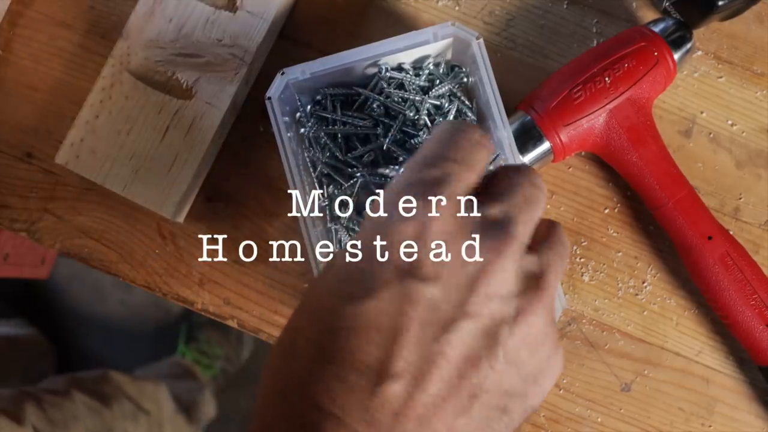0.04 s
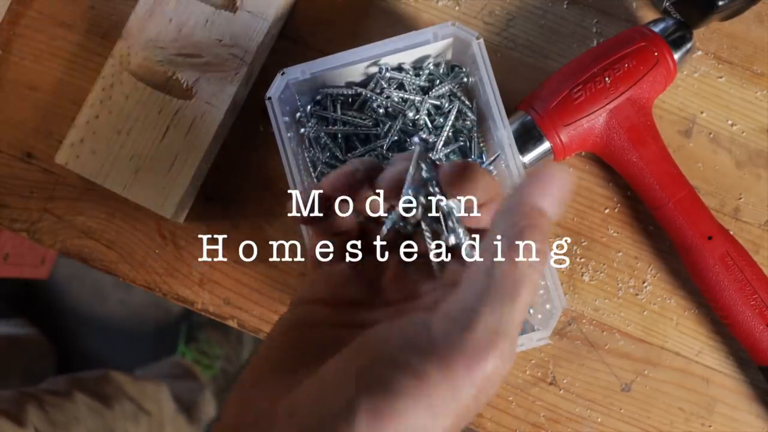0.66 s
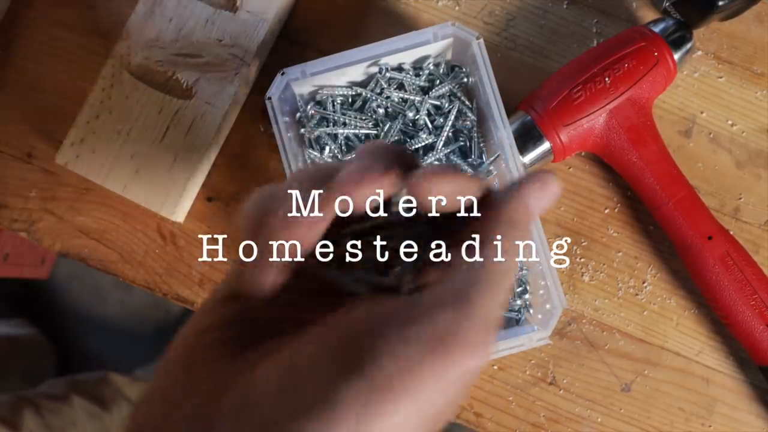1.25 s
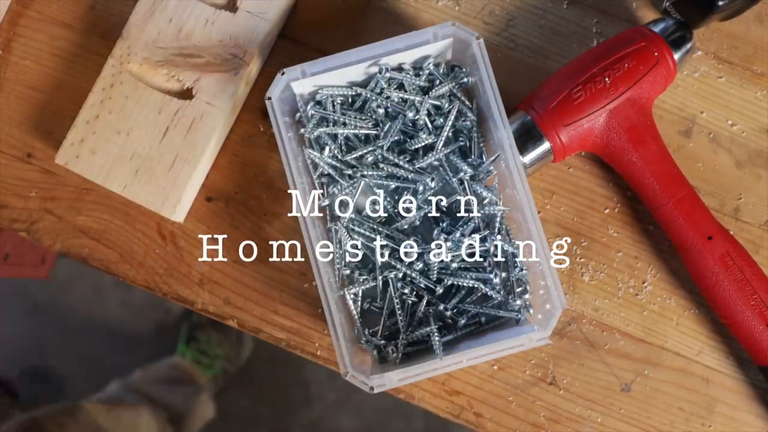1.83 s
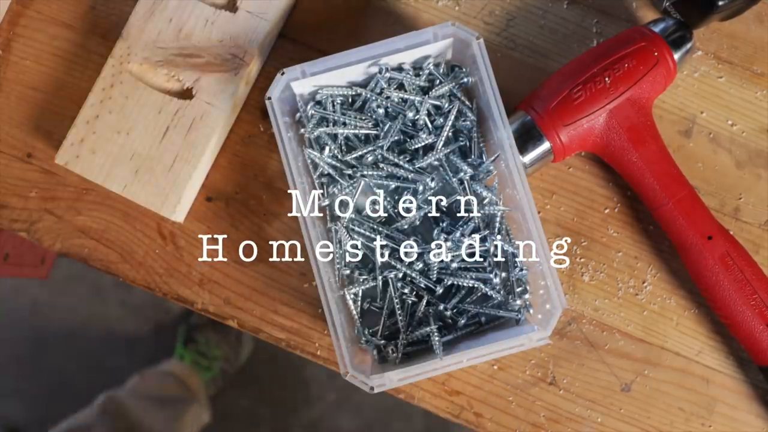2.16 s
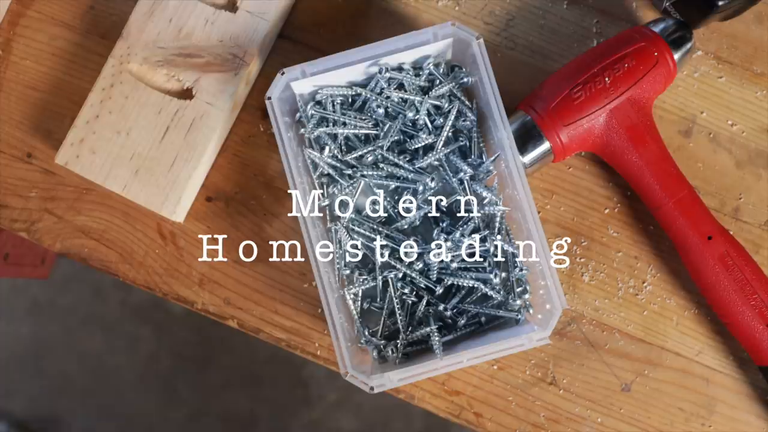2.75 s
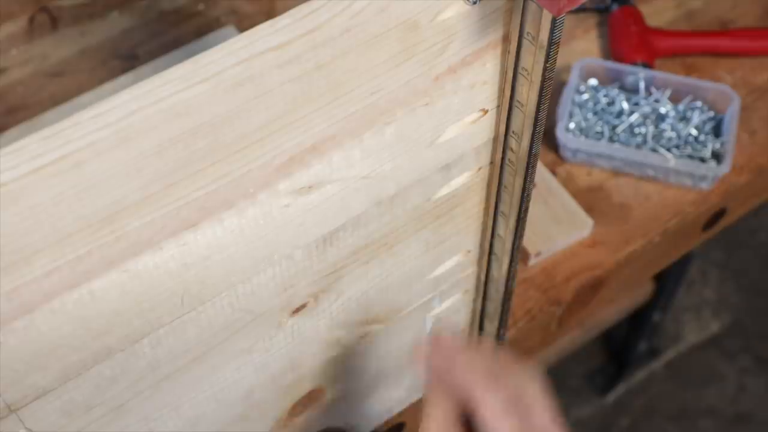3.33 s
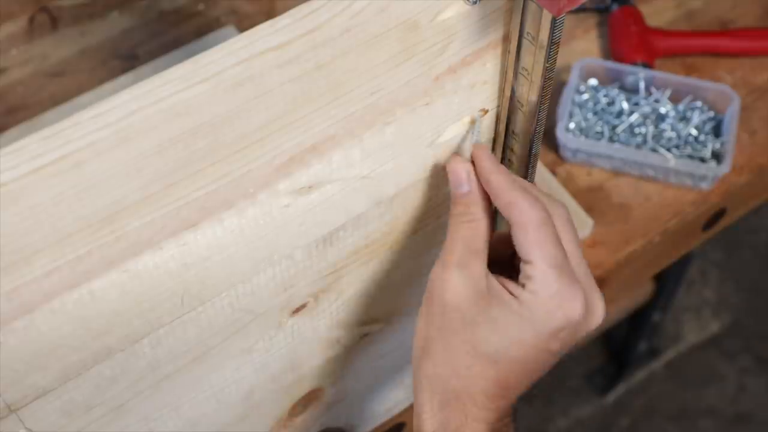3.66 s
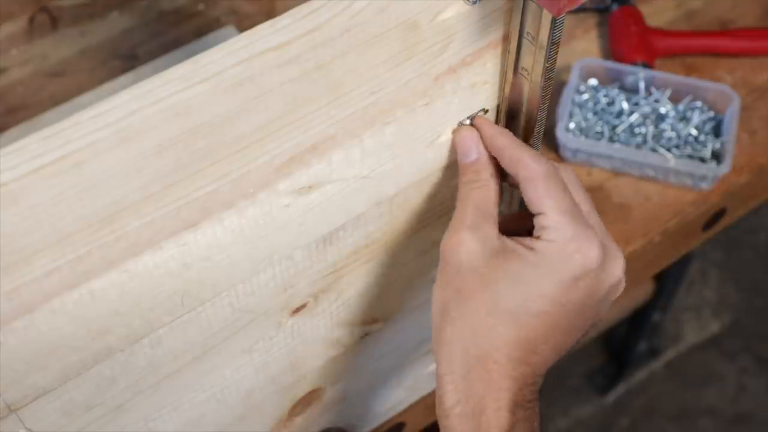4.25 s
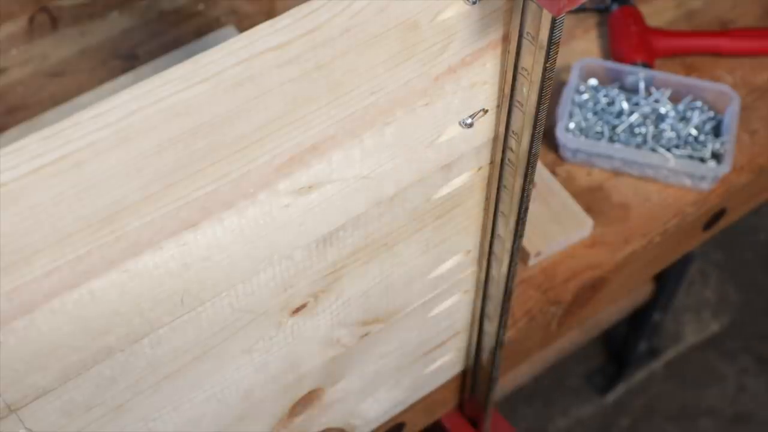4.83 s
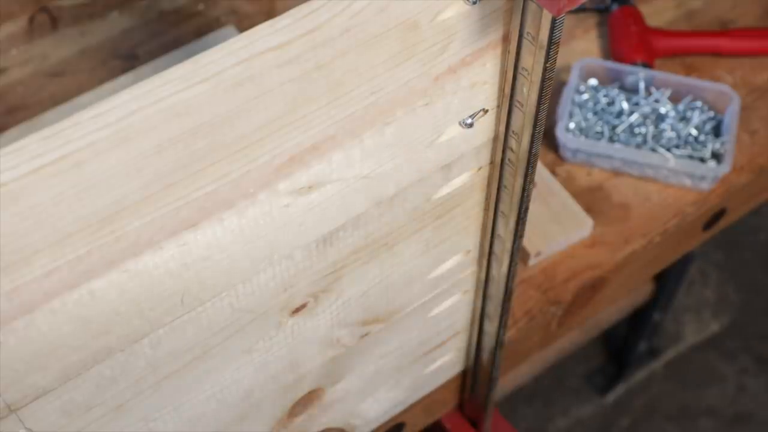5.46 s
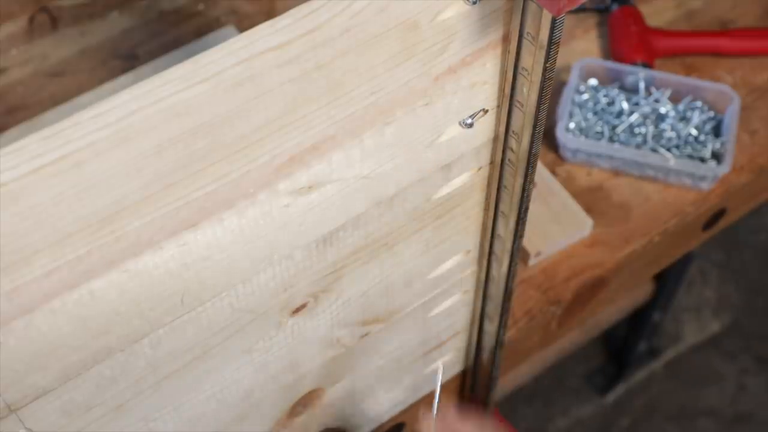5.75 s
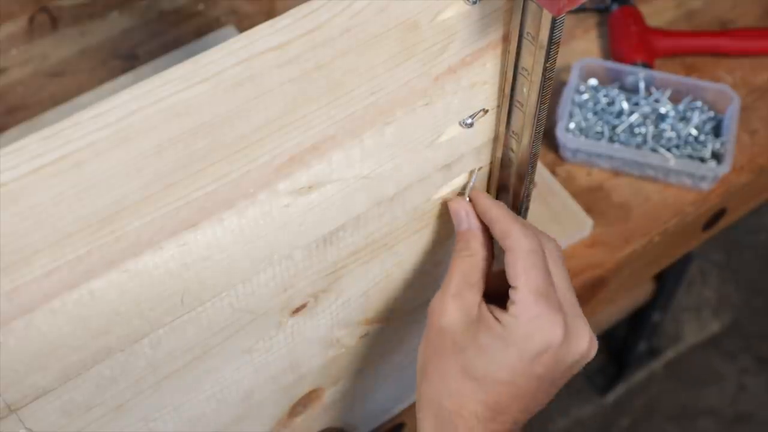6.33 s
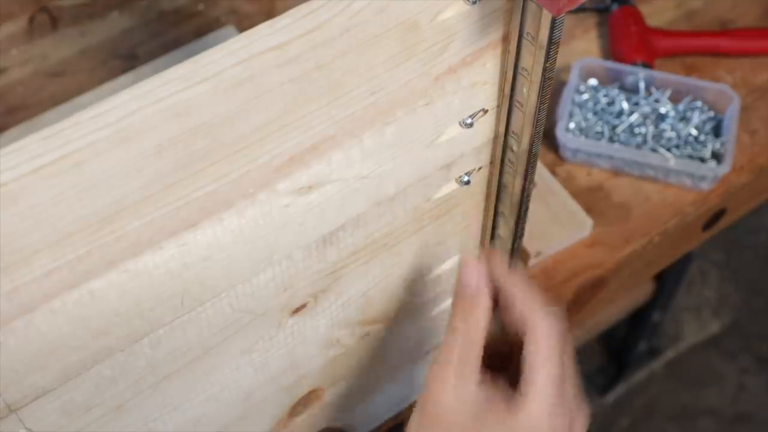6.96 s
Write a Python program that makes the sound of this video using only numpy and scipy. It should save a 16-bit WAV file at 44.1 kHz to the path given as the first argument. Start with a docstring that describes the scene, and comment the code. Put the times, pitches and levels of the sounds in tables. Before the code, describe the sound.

A hand digs out steel screws that clink brightly, followed by light scraping and two hard knocks on a wooden board.

```python
"""Steel screws rattle against the walls of a small plastic box as a hand digs them out on a workbench.
They jingle and clink in the palm, ringing at nearly one pitch and beating against each other.
A screw tip then scrapes and taps in a hole in a pine board, and two hard knocks ring the board's
bending modes. The workshop adds a short echo over faint air noise, hum and soft swells of shuffle."""
import sys
import numpy as np
from scipy import signal
from scipy.fft import rfft, irfft, next_fast_len
from scipy.io import wavfile
from scipy.ndimage import uniform_filter1d

SR = 44100
rng = np.random.default_rng(int(sys.argv[2]) if len(sys.argv) > 2 else 0)


def transcribe(signal):
    """Save signal, clipped to [-1, 1], as a 16-bit WAV file at the path in sys.argv[1]."""
    frames = np.atleast_2d(signal).T
    limited = np.clip(frames, -1, 1)
    pcm = np.round(limited * 32767).astype(np.int16)
    wavfile.write(sys.argv[1], SR, pcm)


N = 313110


def amp(db):
    """Decibels to gain."""
    return 10 ** (np.asarray(db) / 20)


def unit(x):
    """Scale to rms 1."""
    return x / np.sqrt(np.mean(x ** 2) + 1e-20)


def seconds(size):
    """Time axis."""
    return np.arange(size) / SR


def fade(t, t60_s):
    """Exponential decay from t = 0."""
    return (t >= 0) * np.exp(-np.log(1000) * np.abs(t) / t60_s)


def held(start_s, length_s, attack_s, release_s):
    """Envelope: rise, hold, decay."""
    t = seconds(N) - start_s
    return (t >= 0) * (1 - fade(t, attack_s)) * fade(np.maximum(t - length_s, 0), release_s)


def along(points, hz):
    """Interpolate (freq_hz, value) points on a log axis."""
    freqs_hz, values = np.transpose(points)
    return np.interp(np.log(hz + 1), np.log(freqs_hz), values)


def add(track, start_s, sound):
    """Mix a sound into a track."""
    start = max(round(start_s * SR), 0)
    part = track[start:start + len(sound)]
    part += sound[:len(part)]


def filtered(x, response):
    """Apply a frequency response."""
    size = next_fast_len(len(x) + 8192)
    return irfft(rfft(x, size) * response(np.fft.rfftfreq(size, 1 / SR)), size)[:len(x)]


def coloured(x, spectrum):
    """Shape x by a spectrum, at rms 1."""
    return unit(filtered(x, lambda hz: amp(along(spectrum, hz))))


def noise(spectrum, size=N):
    """Shaped noise at rms 1."""
    return coloured(rng.standard_normal(size), spectrum)


def resonate(x, peaks):
    """Pass x through a body's resonances, alternating in polarity."""
    def response(hz):
        return sum((-1) ** k * amp(db) * 1j * hz * width / (centre ** 2 - hz ** 2 + 1j * hz * width)
                   for k, (centre, width, db) in enumerate(peaks))
    return filtered(x, response)


def contacts(per_s, spread_db):
    """Random tiny impacts of uneven strength, at rms 1."""
    strength = amp(spread_db * np.clip(rng.standard_normal(N), -2, 2)) * rng.choice([-1, 1], N)
    return unit(strength * (rng.random(N) < per_s / SR))


def evened(x, span_s):
    """Hold the running rms near 1."""
    power = uniform_filter1d(x ** 2, max(int(span_s * SR), 1))
    return x / np.sqrt(np.abs(power) + 1e-3)


def struck(peaks, contact_t60_s, cutoff_hz):
    """A body's response to one gritty contact, at peak 1; softness cuts the treble."""
    t = seconds(4096)
    push = 0.5 * fade(t, contact_t60_s) * rng.standard_normal(len(t))
    push[0] += 1
    ring = resonate(push, peaks)
    ring = filtered(ring, lambda hz: 1 / (1 + 1.3j * hz / cutoff_hz - (hz / cutoff_hz) ** 2))
    return ring / np.abs(ring).max()


# plastic wall resonances: centre_hz, width_hz, gain_db
BOX_MODES = [(1074, 100, -4), (1287, 193, 0.5), (1467, 90, 3.5), (1715, 204, 0.5), (2256, 174, -2.5),
             (3060, 690, -12)]
# stirred heap: freq_hz, density_db
STIR_SPECTRUM = [(50, -28), (130, -13.5), (600, -12), (1200, -5.5), (3000, -3), (4500, -19), (7000, -21.5),
                 (15000, -12)]
# screws hitting the wall: start_s, level_db
WALL_HITS = [(0.0419, -30), (0.0547, -28), (0.0734, -25.5), (0.1879, -33.5), (0.2662, -36), (0.2748, -36),
             (0.8103, -50), (2.4995, -52)]


def box_rattle():
    """Fingers plunge in; screws drum on the thin plastic walls and settle."""
    level = amp(-42) * held(0, 0.043, attack_s=0.003, release_s=0.65)
    walls = unit(resonate(contacts(per_s=1600, spread_db=1.5), BOX_MODES))
    grit = coloured(contacts(per_s=1100, spread_db=6), STIR_SPECTRUM)
    out = level * (amp(-0.5) * evened(walls, span_s=0.015) + amp(-3.5) * grit)
    for start_s, level_db in WALL_HITS:
        add(out, start_s, amp(level_db - 4) * struck(BOX_MODES, contact_t60_s=0.027, cutoff_hz=2440))
    return out


# shakes of the hand: start_s, rise_s, length_s, level_db
HAND_SHAKES = [(0.0, 0.072, 0.1, -42.5), (0.14, 0.033, 0.088, -55), (0.925, 0.092, 0.22, -39.5),
               (1.125, 0.0046, 0.12, -49), (1.252, 0.045, 0.091, -48), (1.804, 0.047, .077, -43.5),
               (2.12, 0.047, 0.083, -50.5), (2.199, 0.072, 0.11, -44), (2.428, .045, 0.15, -38),
               (2.536, 0.021, .075, -32), (2.619, 0.0097, 0.11, -39.5)]


def shaking(swell_db=7, ease_db=11):
    """Motion of the screws as a gain: each shake starts abruptly, swells, eases and stops."""
    t, level = seconds(N), np.zeros(N)
    for start_s, rise_s, length_s, level_db in HAND_SHAKES:
        effort_db = np.interp(t - start_s, [0, rise_s, max(length_s, rise_s)], [-swell_db, 0, -ease_db])
        level += amp(level_db + effort_db) * held(start_s, length_s, attack_s=0.0088, release_s=0.12)
    return level


# screw modes, second row damped and detuned by neighbours: pitch_hz, level_db, t60_s, spread_ratio
SCREW_MODES = [(10233, 4, 0.095, 0.0195), (10210, -3.5, .018, 0.055), (12180, -20, 0.026, 0.065),
               (13900, -25, 0.013, 0.09)]
# steel on steel: freq_hz, density_db
TICK_SPECTRUM = [(800, -17.5), (2500, -13.5), (5000, -14), (7500, -7.5), (9000, -3), (10500, 7),
                 (11600, 0.5), (12200, -2.5), (14000, -6), (15800, -18.5)]


def jingle(screws=12):
    """Screws of one size ring at nearly one pitch and beat; their threads rasp after each contact."""
    t = seconds(4096)
    ring, hits = np.zeros(N), np.zeros(N)
    for offset in np.linspace(-1, 1, screws) + rng.normal(0, 0.038, screws):
        blows = contacts(per_s=41, spread_db=5)
        modes = sum(amp(db) * np.sin(2 * np.pi * hz * (1 + spread * offset) * t) * fade(t, t60_s)
                    for hz, db, t60_s, spread in SCREW_MODES)
        ring += signal.oaconvolve(blows, modes * (1 - fade(t, 0.00095)))[:N]
        hits += blows
    ring = evened(unit(ring), span_s=0.019)
    rasp_power = signal.oaconvolve(hits ** 2, fade(t, 0.012) ** 2)[:N]
    rasp = np.sqrt(np.abs(rasp_power)) * rng.standard_normal(N)
    rasp = evened(coloured(rasp, TICK_SPECTRUM), span_s=0.021)
    level = shaking()
    # gentle handling favours sliding over ringing
    return amp(-1.5) * level * ring + amp(-31) * level ** 0.64 * rasp


def pings(lowest_hz=11800, highest_hz=15700, t60_s=0.0206, screws=14):
    """Each screw, gripped differently by its neighbours, has its own brief high note."""
    t, notes = seconds(2048), np.zeros(N)
    for pitch_hz in rng.uniform(lowest_hz, highest_hz, screws):
        note = np.sin(2 * np.pi * pitch_hz * t) * fade(t, t60_s)
        notes += signal.oaconvolve(contacts(per_s=14, spread_db=5), note)[:N]
    return amp(-27.5) * shaking() ** 0.86 * unit(notes)


# distinct clinks: start_s, level_db, grip_ratio (0 loose, 1 pinched)
SINGLE_CLINKS = [(0.0544, -32.5, .2), (0.072, -34.5, 0.13), (0.163, -46, .15), (0.19, -43, 0.26),
                 (0.229, -48, 0.25), (0.265, -43.5, 0.23), (0.274, -43, 0.098), (0.433, -42.5, 0.41),
                 (0.443, -42, .14), (0.473, -48, 0.54), (0.485, -43.5, 0.27), (0.506, -46.5, 0.32),
                 (0.606, -59, .26), (0.8347, -48, .05), (0.8869, -46, 0.32), (0.9297, -48, 0.051),
                 (1.05, -19, .02), (1.1319, -20.5, .01), (1.173, -30.5, .02), (1.303, -34.5, 0.045),
                 (1.3372, -42, .15), (1.7835, -54.5, .35), (1.8485, -34, .05), (1.8582, -30.5, .02),
                 (1.942, -50, .08), (2.0842, -54, .2), (2.142, -36, 0.022), (2.2092, -38, 0.15),
                 (2.2352, -30, .02), (2.2666, -28.5, 0.065), (2.3094, -33.5, .05), (2.3363, -36.5, 0.045),
                 (2.4804, -29.5, 0.062), (2.5418, -23.5, .07), (2.5597, -24.5, 0.026),
                 (2.6232, -25.5, 0.027), (2.6845, -22, 0.018), (2.739, -31, 0.067), (3.094, -50, 0.13),
                 (6.549, -54, 0.51)]


def clinks(t60_s=0.041, beat_hz=220, pitch_spread=0.016, stray_count=20):
    """Two screws meet: loose ones ring slightly apart in pitch, pinched ones tick."""
    out, t = np.zeros(N), seconds(4096)
    attack = 1 - fade(t, 0.007)
    # faint random slips in the hand
    strays = [(rng.uniform(0.3, 3.1), rng.uniform(-64, -53), 0.2) for _ in range(stray_count)]
    for start_s, level_db, grip in SINGLE_CLINKS + strays:
        detune, apart = rng.uniform(-1.06, 1, 2)
        pitch_hz = SCREW_MODES[0][0] * (1 + pitch_spread * detune)
        other_hz = pitch_hz - np.sign(detune) * beat_hz * (1 + apart / 2)
        pair = np.sin(2 * np.pi * pitch_hz * t) + 0.5 * np.sin(2 * np.pi * other_hz * t)
        ring = pair * fade(t, t60_s) * attack
        tick = amp(11.5) * noise(TICK_SPECTRUM, len(t)) * fade(t, 0.02) * (1 - fade(t, 0.0017))
        add(out, start_s, amp(level_db - 1.5) * ((1 - grip) * ring + grip * tick))
    return out


# workshop decay: freq_hz, t60_s
ROOM_DECAY = [(100, 0.23), (300, 0.98), (600, 0.95), (1500, 1), (3000, 0.9), (6000, 0.69), (10000, 0.41),
              (16000, 0.47)]


def echo_tail(steady_noise):
    """The workshop's echo builds up, then dies fastest in the bass and high treble."""
    hz, t, bands = signal.stft(steady_noise, SR, nperseg=256)
    tail = signal.istft(bands * fade(t, along(ROOM_DECAY, hz)[:, None]), SR, nperseg=256)[1]
    return tail * (1 - fade(seconds(len(tail)), 0.01))


def in_room(x, wet_db):
    """Direct sound plus the workshop's echo."""
    tail = echo_tail(rng.standard_normal(SR))
    return x + amp(wet_db) * signal.fftconvolve(x, tail / np.linalg.norm(tail))[:N]


# room air: freq_hz, density_db
AIR_SPECTRUM = [(15, -42), (25, -8.5), (80, -2.5), (269, -5.5), (486, -6), (557, -7), (620, -2.5),
                (1120, -11), (1220, -11.5), (3050, -15), (7630, -19.5), (10300, -17), (15800, -20)]
# electric hum: pitch_hz, level_db
HUM_PARTIALS = [(398.4, -87), (802.1, -85.5), (1001, -82.5), (1200, -82.5), (1400, -84), (1599, -94)]


def room_tone():
    """Steady air noise, and a faint hum that fades as the work moves to the board."""
    t = seconds(N)
    hum = sum(amp(db) * np.sin(2 * np.pi * (hz * t + rng.random())) for hz, db in HUM_PARTIALS)
    return amp(-72.5) * noise(AIR_SPECTRUM) + hum * np.interp(t, [3.8, 4.2], [1, 0])


# soft swells: centre_s, half_width_s, shuffle_db, rustle_db
SWELLS = [(1.6, .1, -75.5, -79.5), (1.97, 0.18, -69, -78), (3.08, 0.099, -67, -77),
          (3.36, 0.18, -69.5, -76.5), (3.62, 0.13, -73, -91.5), (4.83, .1, -67.5, -79),
          (5.04, 0.071, -70, -76), (5.45, 0.056, -72, -77.5), (5.8, 0.21, -68, -78),
          (6.55, 0.15, -56.5, -71), (6.67, 0.044, -74, -63), (6.79, 0.088, -67.5, -64.5),
          (7.1, 0.1, -61, -67.5)]
# low shuffle, high rustle: freq_hz, density_db
SHUFFLE_SPECTRUM = [(30, -24.5), (80, -5.5), (250, -2.5), (450, -7.5), (800, -17), (2000, -21),
                    (5000, -61.5)]
RUSTLE_SPECTRUM = [(2000, -20), (4000, -5), (7000, 0), (10000, -2), (13000, -8), (15800, -14)]


def soft_swells(resting_db=-79):
    """Faint handling noise, plus a soft low swell at 6.55 s in the second knock's dying echo."""
    t = seconds(N)
    shuffle, rustle = amp(resting_db), 0
    for centre_s, half_width_s, shuffle_db, rustle_db in SWELLS:
        swell = np.exp(-((t - centre_s) / half_width_s) ** 2 / 2)
        shuffle = np.hypot(shuffle, amp(shuffle_db) * swell)
        rustle = np.hypot(rustle, amp(rustle_db) * swell)
    return shuffle * noise(SHUFFLE_SPECTRUM) + rustle * noise(RUSTLE_SPECTRUM)


# dull bench bump: freq_hz, density_db
BUMP_SPECTRUM = [(50, -41), (130, -5.5), (300, -15), (420, -12), (520, -12.5), (640, -6.5), (800, -17),
                 (1500, -28.5)]


def bench_bump():
    """The shaking hand nudges the bench once."""
    return amp(-58) * noise(BUMP_SPECTRUM) * held(2.118, 0.041, attack_s=0.06, release_s=0.21)


# strokes of the tip: start_s, length_s, level_db
TIP_STROKES = [(3.861, 0.041, -54.5), (3.954, 0.015, -53.5), (4.033, 0.057, -53.5), (4.2, 0.034, -53),
               (4.274, 0.039, -53), (4.386, 0.013, -54)]
# resonances of the screw in its hole: centre_hz, width_hz, gain_db
HOLE_MODES = [(242, 47, -17), (332, 29, -8), (426, 47, -19), (599, 21, 5), (758, 32, 5), (996, 52, 2.5),
              (1510, 210, -3.5), (1766, 63, -2.5), (1904, 170, -6), (2330, 340, -14.5)]
# weight of the hand: freq_hz, density_db
THUD_SPECTRUM = [(40, -48), (75, -7), (130, 7), (175, -23), (250, -3), (600, 6.5), (1500, -50)]


def tip_scrape(cutoff_hz=2600):
    """The screw tip drags over the grain in tiny slips."""
    level = sum(amp(level_db) * held(start_s, length_s, attack_s=0.043, release_s=0.12)
                for start_s, length_s, level_db in TIP_STROKES)
    slips = resonate(contacts(per_s=1400, spread_db=8), HOLE_MODES)
    scrape = unit(filtered(slips, lambda hz: 1 / (1 + (hz / cutoff_hz) ** 4)))
    return level * (amp(-4.5) * evened(scrape, span_s=0.016) + amp(-2) * noise(THUD_SPECTRUM))


# board resonances under the hand: centre_hz, width_hz, gain_db
PRESSED_MODES = [(79.8, 6.6, -4), (129.6, 9.3, -1.5), (244, 11, -2), (334, 20, -3.5), (453, 20, -4.5)]


def board_murmur(start_s=3.885, length_s=0.74, ease_db_per_s=31, cutoff_hz=700):
    """Slips of the pressed screw drive the board's low resonances, less as the pressure eases."""
    eased_db = ease_db_per_s * np.maximum(seconds(N) - start_s, 0)
    level = amp(-54.5 - eased_db) * held(start_s, length_s, attack_s=0.019, release_s=0.3)
    slips = resonate(contacts(per_s=1800, spread_db=8.5), PRESSED_MODES)
    murmur = filtered(slips, lambda hz: 1 / (1 + (hz / cutoff_hz) ** 4))
    return level * evened(unit(murmur), span_s=0.05)


# taps of the tip: start_s, level_db, relative_edge_db
TIP_TAPS = [(3.924, -40.5, -36), (3.971, -47, -39), (4.047, -43.5, -31), (4.061, -43, -24),
            (4.076, -41.5, -39), (4.180, -29, -22.5), (4.185, -33.5, -37), (4.232, -37, -36),
            (4.240, -39, -44), (4.342, -38, -19), (4.349, -36.5, -43), (4.374, -32.5, -23),
            (4.482, -61, -32), (6.839, -38.5, -21.5)]
# a tap's sharp edge: freq_hz, density_db
EDGE_SPECTRUM = [(1200, -17), (2500, 14), (4000, 2.5), (6000, -6.5), (8000, -17), (14000, -37)]


def tip_taps():
    """The tip drops against the sides of the hole with the hand's weight behind it."""
    out, t = np.zeros(N), seconds(4096)
    for start_s, level_db, edge_db in TIP_TAPS:
        edge = amp(edge_db + 10.5) * noise(EDGE_SPECTRUM, len(t)) * fade(t, 0.033)
        thud = amp(-58) * noise(THUD_SPECTRUM, len(t)) * fade(t, 0.11)
        ring = struck(HOLE_MODES, contact_t60_s=0.027, cutoff_hz=2370)
        add(out, start_s, amp(level_db) * (ring + edge) + thud)
    return out


# hard knocks: start_s, level_db, relative_crack_db, crack_tilt_db_per_octave, relative_echo_db
BOARD_KNOCKS = [(5.8968, -8.5, -10, -5.5, -23.5), (6.417, -5.5, -11.5, -2, -24)]
# bending modes: pitch_hz, level_db, t60_s
BOARD_MODES = [(136.4, -25.5, 0.31), (157.4, -24.5, 0.41), (222, -11, 0.1), (243.5, -14.5, 0.18),
               (330.4, -8.5, 0.17), (366, -9.5, 0.03), (469, -7, 0.1), (539, -16, 0.26), (591, -24.5, 0.44),
               (649, -17.5, 0.13), (796, -12, 0.034), (942, -10, 0.096), (1019, -3, 0.055),
               (1140, 2, 0.033), (1298, -6.5, 0.028), (1364, -13.5, 0.072), (1560, -25, 0.035),
               (1630, -8, 0.025), (2064, -17.5, 0.046)]
# contact crack: freq_hz, density_db
CRACK_SPECTRUM = [(200, -20), (1000, 0), (2000, 2), (2500, -7), (3200, -2), (4500, -7), (6500, -9),
                  (8900, -6), (10500, -18), (14500, -19), (15800, -32)]


def knocks(push_hz=565, push_cycles=1.5, travel_s=0.002865):
    """A blow shoves the board and cracks at the contact; bending waves ring it, low ones last."""
    out, t = np.zeros(N), seconds(22050)
    progress = np.minimum(t * push_hz / push_cycles, 1)
    push = -amp(5) * np.sin(2 * np.pi * push_hz * t) * np.sqrt(np.abs(np.sin(np.pi * progress)))
    for start_s, level_db, crack_db, tilt, _ in BOARD_KNOCKS:
        ring = np.zeros(len(t))
        for pitch_hz, mode_db, t60_s in BOARD_MODES:
            age_s = t - travel_s * np.sqrt(push_hz / pitch_hz)
            envelope = fade(age_s, t60_s) * (1 - fade(age_s, 0.0012))
            ring += amp(mode_db + rng.normal(0, 0.33)) * np.sin(2 * np.pi * pitch_hz * age_s) * envelope
        tilted = [(hz, db + tilt * np.log2(hz)) for hz, db in CRACK_SPECTRUM]
        crack = amp(crack_db) * noise(tilted, len(t)) * fade(t, 0.029)
        add(out, start_s, amp(level_db) * (push + ring + crack))
    # the knocks carry no deep bass
    return signal.sosfilt(signal.butter(6, 130, "high", fs=SR, output="sos"), out)


# board radiation in all directions: freq_hz, density_db
WASH_SPECTRUM = [(70, -30.5), (110, -30), (145, -0.5), (300, 3), (500, 4.5), (700, -0.5), (1150, -5),
                 (1700, -13), (2500, -17.5), (4000, -30.5), (8000, -43.5), (10500, -39.5), (13000, -57.5)]


def knock_wash():
    """The board radiates to all sides, so its echo is smoother in colour than the direct knock."""
    out = np.zeros(N)
    for start_s, level_db, _, _, echo_db in BOARD_KNOCKS:
        add(out, start_s, amp(level_db + echo_db) * echo_tail(noise(WASH_SPECTRUM, SR)))
    return out


def scene():
    """All sources in one room, mono; the jingling screws are close and nearly dry."""
    box = in_room(box_rattle(), wet_db=-11.5)
    screws = in_room(jingle() + pings() + clinks(), wet_db=-19)
    background = room_tone() + soft_swells() + bench_bump()
    tip = in_room(tip_scrape() + board_murmur() + tip_taps(), wet_db=-17.5)
    blows = in_room(knocks(), wet_db=-18.5) + knock_wash()
    return (box + screws + background + tip + blows)[None]


def record(dry, ceiling=0.9, top_hz=15830):
    """Soft-clip the loudest peaks, then band-limit."""
    rounded = dry[0] / (1 + np.abs(dry[0] / ceiling) ** 8) ** (1 / 8)
    return filtered(rounded, lambda hz: hz < top_hz)[None]


dry = scene()
out = record(dry)
transcribe(out)
```